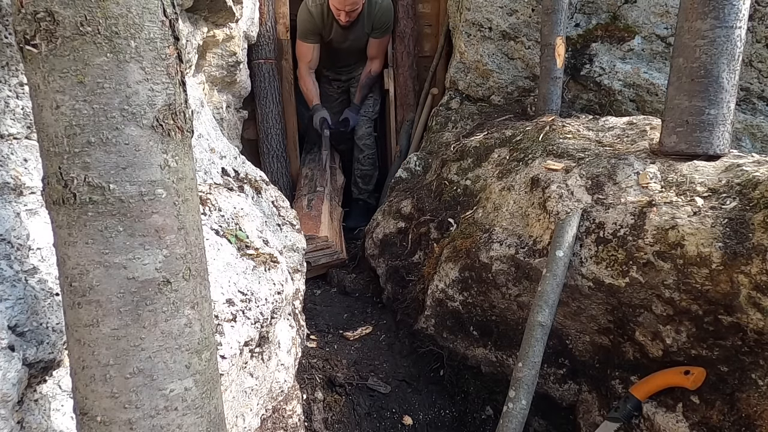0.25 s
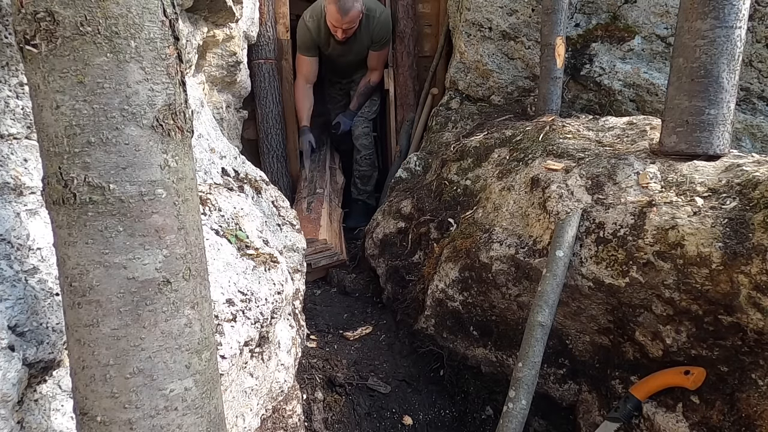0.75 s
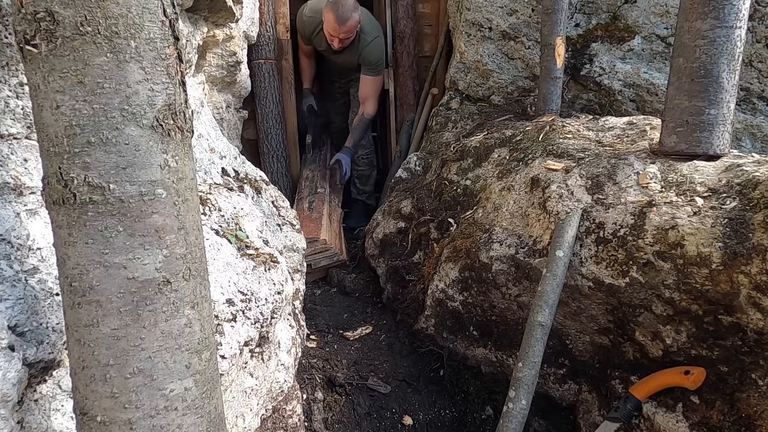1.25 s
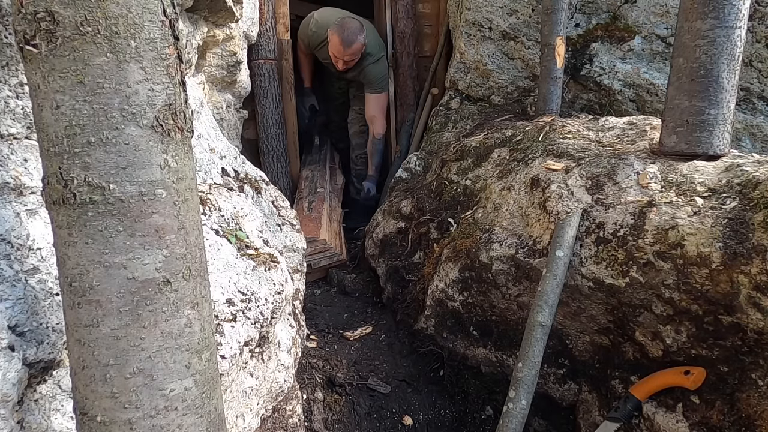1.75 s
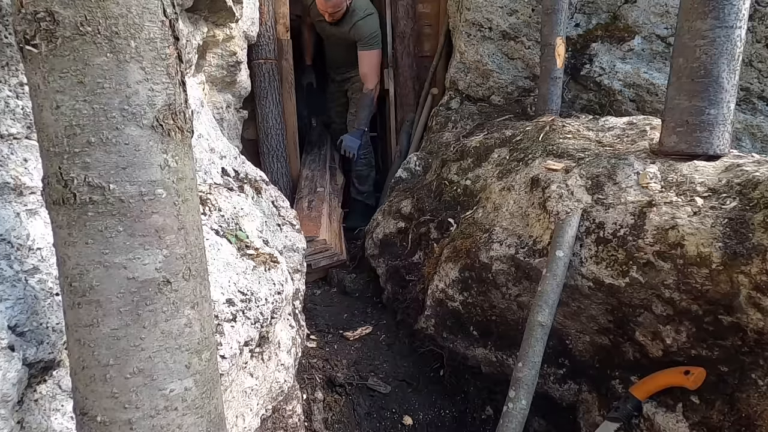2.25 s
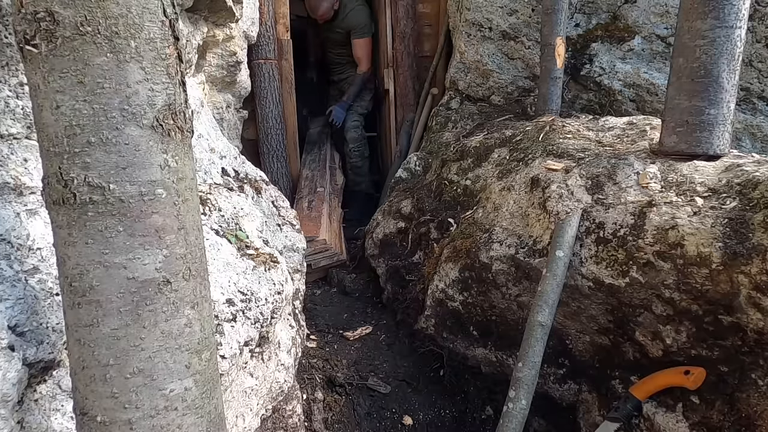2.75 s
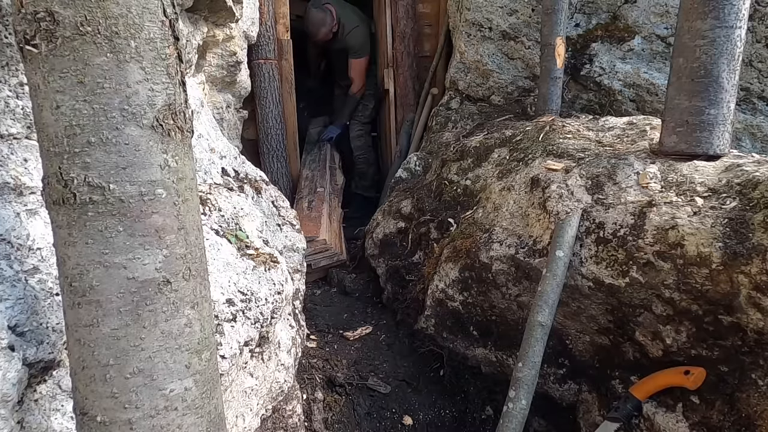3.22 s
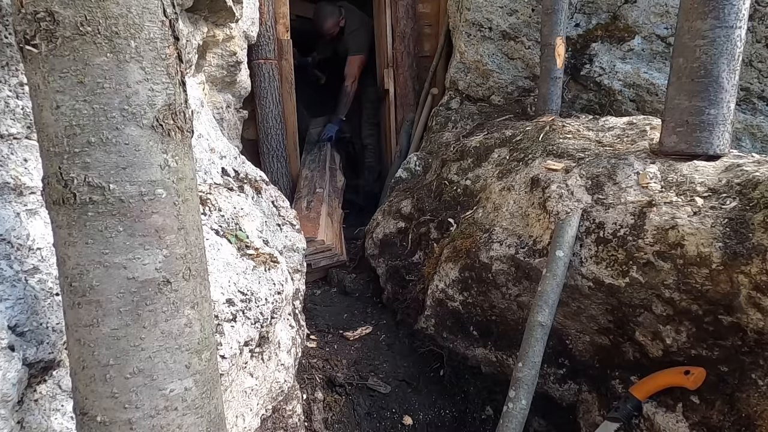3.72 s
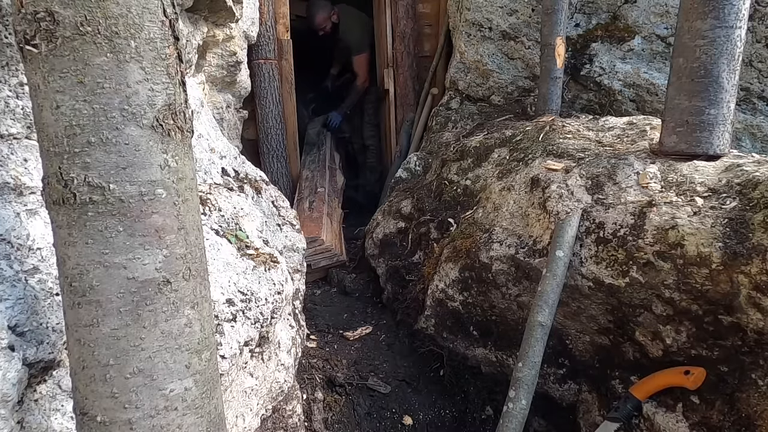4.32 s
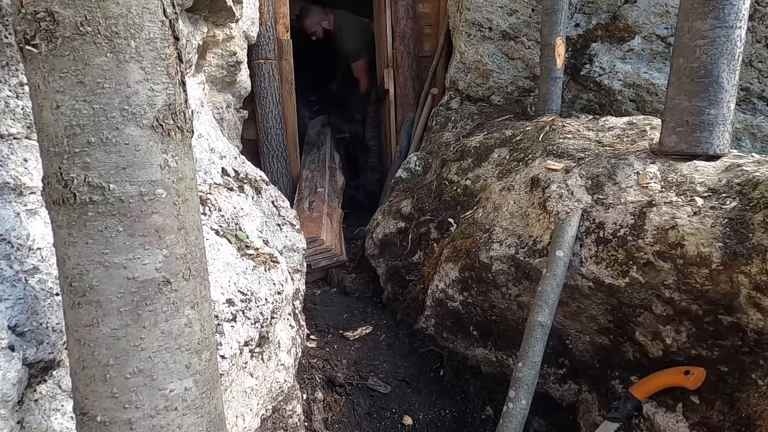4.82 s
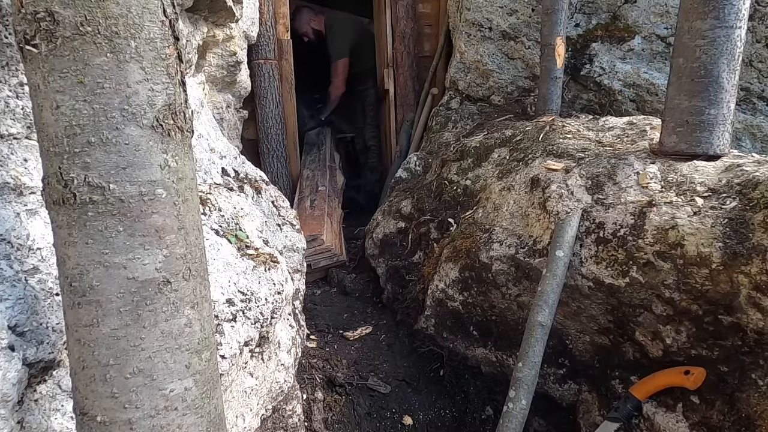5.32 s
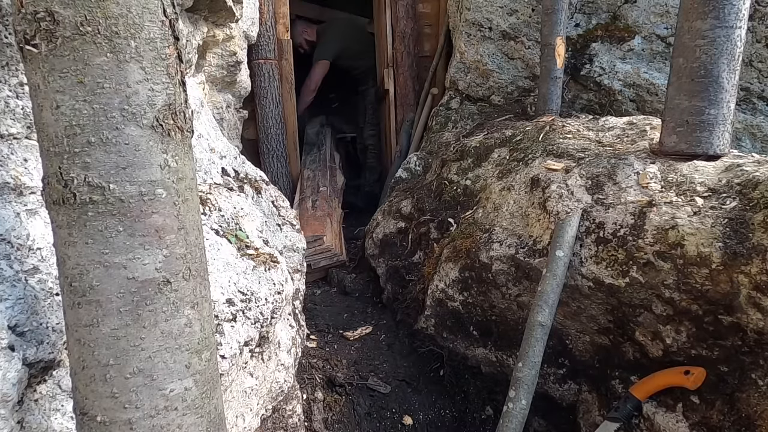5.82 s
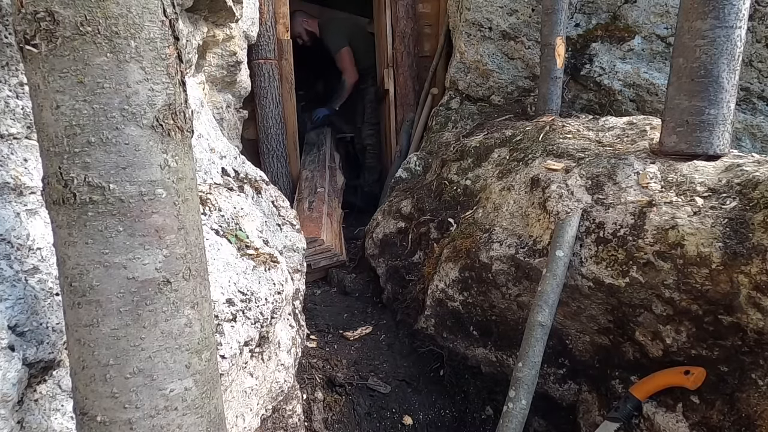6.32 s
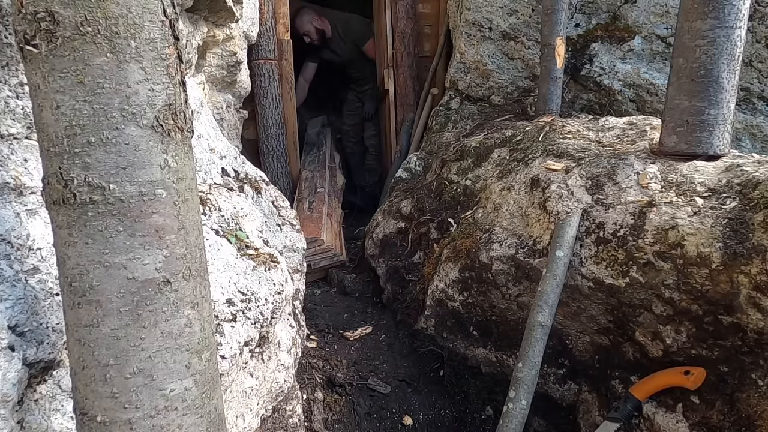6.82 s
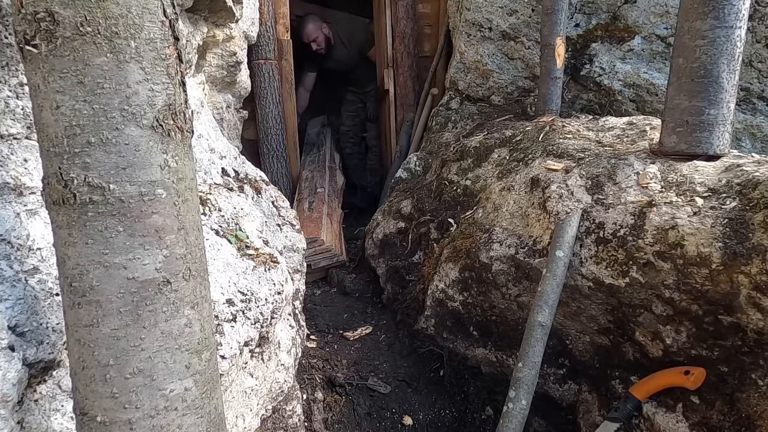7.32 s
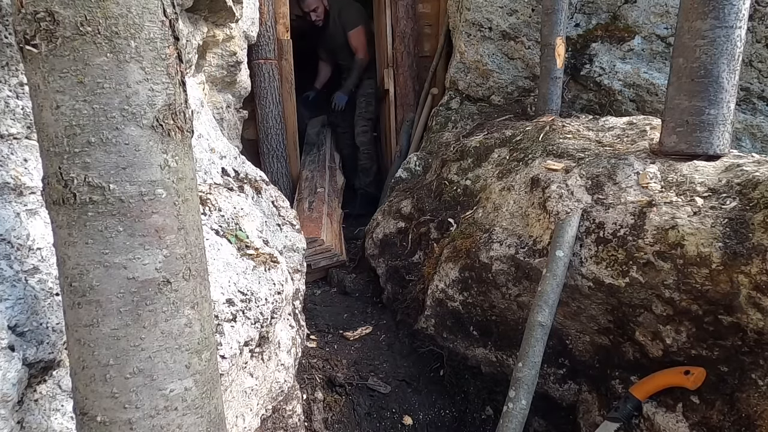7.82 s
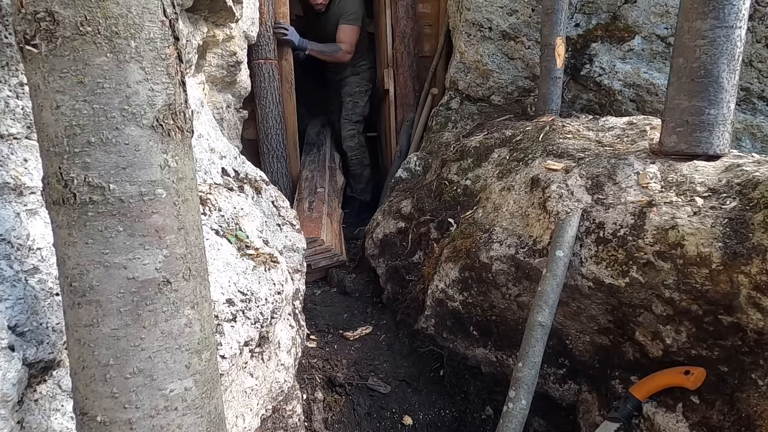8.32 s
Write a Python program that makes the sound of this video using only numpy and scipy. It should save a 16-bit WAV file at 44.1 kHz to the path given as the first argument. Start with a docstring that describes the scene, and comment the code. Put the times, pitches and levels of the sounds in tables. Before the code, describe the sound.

Heavy wooden boards knock and clatter onto a stack in a rocky cleft, with sleeve rustle, faint birdsong and soft forest murmur.

```python
"""Boards stacked between rocks

Flat wooden boards are lifted, slid and dropped onto a stack in a narrow cleft between rocks.
Random clicks ring the wood's tones, and banded noise makes the cracks, the rustle of sleeves and bark,
and the forest murmur. Birds sing some way off in bent, near-sine notes; feedback delays echo
the wood and the birds off the rock."""
import sys
import numpy as np
from scipy import signal
from scipy.fft import rfft, irfft, next_fast_len
from scipy.io import wavfile

SR = 44100
rng = np.random.default_rng(int(sys.argv[2]) if len(sys.argv) > 2 else 0)


def file_out(sig):
    """Save sig as 16-bit WAV at sys.argv[1]."""
    # one column per channel
    cols = np.atleast_2d(sig).T
    # limit, then scale
    lim = np.clip(cols, -1, 1)
    pcm = np.round(lim * 32767).astype(np.int16)
    wavfile.write(sys.argv[1], SR, pcm)


N = 377055   # length in samples

# Forest air. Each row: time in seconds, low murmur in dB, leaf hiss in dB.
AIR_LEVELS = [(0, -48, -45), (.63, -50, -48), (.75, -55.5, -55), (2.0, -54, -48), (2.6, -50.5, -49.5),
              (3.46, -45.5, -47), (3.6, -55.5, -50), (4.6, -53, -51.5), (4.9, -51.5, -48.5),
              (7.2, -49, -44.5), (8.55, -45, -51)]
# Tone colour of the air. Each row: frequency in Hz, strength in dB per Hz.
AIR_SPECTRUM = [(20, 2.5), (60, 4.5), (110, -5), (180, 6.5), (440, -5.5), (800, -10.5), (1200, -2),
                (2000, -11.5), (3300, -21), (7000, -24.5), (11000, -50), (15500, -45)]
# How alike left and right are in noisy sounds. Each row: frequency in Hz, likeness from 0 to 1.
LIKENESS = [(60, 0.48), (180, 0.21), (550, 1), (1650, 0.34), (4970, 0.53), (15000, 0.11)]
# Left-right balance of noisy sounds. Each row: frequency in Hz, left minus right in dB.
SIDE_BALANCE = [(4000, 1), (8000, -3), (13000, -5)]
# Strokes of handling. Each row: start in seconds, length in seconds, wood sliding on wood in dB,
# sleeve and bark rustle in dB.
HANDLING = [(0.0, 0.5, -83, -51.5), (0.339, 0.13, -53.5, -51), (1.013, 0.068, -28.5, -44),
            (1.183, 0.14, -72, -53), (1.584, 0.27, -47, -43.5), (1.857, 0.28, -47, -44.5),
            (2.105, 0.57, -49.5, -59), (2.279, 0.19, -48.5, -44.5), (2.604, 0.23, -53, -51.5),
            (2.818, 0.067, -49, -41.5), (2.947, 0.12, -68, -44.5), (3.744, 0.23, -49.5, -52.5),
            (4.651, 0.078, -50, -52.5), (4.772, 0.27, -43, -53.5), (5.325, 0.3, -44.5, -48),
            (5.906, 0.13, -39.5, -39), (6.083, 0.72, -47.5, -54.5), (6.433, 0.24, -57.5, -55.5),
            (7.498, 0.22, -71, -74), (8.163, 0.48, -54.5, -65), (8.437, 0.022, -75, -40)]
# Tone colour of the rustle. Each row: frequency in Hz, strength in dB per Hz.
RUSTLE_SPECTRUM = [(1500, -0.5), (2500, -7), (4000, -9.5), (7000, -14), (10000, -26), (13000, -35),
                   (15500, -50.5)]
# Tones of the boards and the stack under them. Each row: frequency in Hz, relative level in dB.
WOOD_MODES = [(64, -4.5), (88, -6.5), (130, -3.5), (158, 1), (200, 0.5), (242, 0), (320, 1.5), (368, -1.5),
              (450, -13), (535, -7.5), (695, -9), (795, -9), (920, -7.5), (1014, -6), (1105, -1.5),
              (1262, -7.5), (1390, -5), (1522, -3.5), (1834, -8), (2030, -6), (2230, -11), (2620, -14.5),
              (3075, -19)]
# Contacts. Each row: time in seconds, relative level in dB, added low body in dB, treble crack in dB,
# pitch of the spot in Hz, clatter length setting in seconds.
KNOCKS = [(0.963, -5.5, -1, -19.5, 1160, 0.052), (1.079, -36.5, -5.5, 3, 1190, 0.083),
          (1.239, -51, -3, -9, 2040, 0.03), (1.296, -51, -27, 3, 1577, 0.047),
          (1.636, -47.5, 1, -3, 1540, 0.053), (1.666, -42, -15, 8, 1500, 0.075),
          (1.719, -30.5, -12.5, 14, 1290, 0.066), (1.745, -43, -43, 3, 1160, 0.13),
          (1.91, -46, -40, -24, 1220, 0.15), (1.936, -29.5, -57, 12.5, 1980, 0.085),
          (1.975, -45.5, -51, -4, 1300, 0.3), (2.015, -35.5, -44, 12, 1160, 0.04),
          (2.312, -35, -42, -1, 1500, 0.058), (2.378, -40, -34, 21, 1420, 0.097),
          (2.782, -51.5, 15.5, -31.5, 1220, 0.041), (2.976, -40, 10, -48, 530, 0.025),
          (2.993, -35.5, 0, -53, 1270, 0.073), (3.28, -44.5, -6, -6, 1630, 0.04),
          (3.651, -6.5, -2.5, -36.5, 1255, 0.088), (4.167, -10.5, -4.5, -22.5, 1154, 0.074),
          (4.197, -17, -6.5, -29.5, 698, 0.086), (4.68, -46.5, -20, -20, 1130, 0.067),
          (4.711, -52.5, 4.5, -2, 1110, 0.04), (4.857, -49, -21.5, -7.5, 1400, .04),
          (4.899, -46.5, -19, 9, 1100, 0.043), (4.931, -45, -20, 9, 1100, 0.018),
          (5.698, -56, 7, -18.5, 200, 0.077), (5.874, -47, -37, -1, 1130, 0.16),
          (5.904, -43, -38, -21.5, 1110, 0.078), (6.004, -32, -15.5, -18, 1220, 0.045),
          (6.082, -41.5, -20, -13, 1200, 0.13), (6.443, -38.5, -8, -25, 1100, 0.069),
          (6.515, -38, -34.5, -46, 1145, 0.038), (7.361, -27.5, -3, -64, 770, 0.042),
          (7.389, -20.5, 1, -56, 583, 0.079), (7.403, -16.5, -9, -37, 870, 0.058),
          (7.529, -42, 5, 1, 1990, 0.033), (7.55, -32.5, -1.5, -31, 633, 0.12),
          (7.618, -49.5, 4, -10, 530, 0.16), (7.728, -40, -7, -24, 535, 0.075),
          (8.179, -59, 18.5, -25, 520, 0.082)]
# A board's weight lands and shakes the stack's lowest tones. Each row: time in seconds,
# relative level in dB, clatter length setting in seconds.
THUDS = [(0.964, -6.5, 0.05), (1.079, -32, 0.074), (1.718, -32.5, 0.052), (2.782, -28, 0.034),
         (2.994, -21, 0.12), (3.653, -15.5, 0.1), (4.168, -11, 0.088), (7.39, -3, 0.046),
         (7.558, -9, 0.036), (7.618, -21.5, 0.094)]
# Whistles of farther birds. Each row: start in seconds, length in seconds, start pitch in Hz,
# middle pitch in Hz, end pitch in Hz, relative level in dB.
WHISTLES = [(.035, 0.067, 2520, 2520, 2530, -63), (0.109, 0.18, 1960, 2117, 2160, -56.5),
            (0.345, 0.1, 2480, 2800, 3950, -62), (1.098, 0.25, 2346, 2175, 1810, -54.5),
            (1.26, 0.15, 4430, 4363, 4280, -66), (2.497, 0.14, 2700, 3120, 3570, -75.5),
            (4.395, 0.273, 2950, 2910, 2870, -75.5), (3.942, 0.28, 4650, 4760, 4660, -71.5),
            (4.84, 0.13, 2006, 2127, 2190, -56.5), (5.112, 0.13, 1960, 1804, 1850, -59.5),
            (5.289, 0.088, 2365, 2257, 2260, -53), (5.733, 0.051, 3360, 3244, 3150, -59),
            (5.814, 0.19, 3240, 4000, 4150, -64), (6.012, 0.049, 4140, 4060, 3600, -58),
            (7.475, 0.062, 6600, 5800, 3550, -59.5), (6.195, 0.023, 4300, 4940, 5200, -60),
            (6.524, 0.09, 5260, 4800, 6170, -64), (6.854, 0.065, 4630, 4490, 4630, -67),
            (6.928, 0.064, 5060, 5070, 5930, -69), (6.97, 0.094, 2370, 2364, 2410, -64),
            (7.229, 0.033, 5100, 4450, 3640, -62), (7.954, 0.021, 3100, 3910, 3960, -60),
            (8.0, 0.115, 2430, 2590, 2580, -68), (8.342, 0.033, 5430, 4590, 3960, -60.5)]
# A small warbler's falling note. Each row: seconds from its start, pitch in Hz, relative level in dB.
WARBLER_NOTE = [(0, 7100, -14), (.01, 5500, -9), (.02, 4300, -4), (.036, 4030, 0), (.065, 3950, -1),
                (.082, 3600, -6), (.102, 3050, -15)]
# Its song. Each row: start in seconds, pitch factor, relative level in dB.
WARBLER_SONG = [(5.249, 0.99, -57), (5.616, 1.01, -52.5), (6.351, 1.01, -58.5), (6.725, 1, -59),
                (7.095, 1.19, -56.5), (7.832, 0.93, -58.5), (8.213, 1.16, -57.5)]
# Tone colour of the cracks. Each row: frequency in Hz, strength in dB per Hz.
CRACK_SPECTRUM = [(300, -15.5), (600, -0.5), (1300, -2), (2500, -6.5), (4000, -15.5), (6500, -22),
                  (10000, -31), (15000, -59.5)]
# Something hard and thin knocks the stack. Each row: time in seconds, relative level in dB,
# clatter length setting in seconds.
CLINKS = [(7.301, -38, 0.12), (7.54, -41, 0.087), (7.612, -48.5, 0.049)]
# What the hard thing rings with. Each row: frequency in Hz, relative level in dB.
HARD_MODES = [(1100, 11), (3100, 3.5), (4900, -3.5), (7400, -10)]

DIP_TIMES_S, DIP_DB, DIP_WIDTH_S = [.655, 3.487], -12, .015   # the air's level dips briefly
STRIKE_DB, STRIKE_S = 4, 0.019   # the first blow stands above the clatter and dies fast
SETTLE, CHATTER_DB = 1.188, 3   # over 1: the clatter holds before it falls away; its unevenness
TICKS_PER_S, TICK_DB = 90, -4   # small catches while wood slides
TREBLE_QUICKER = 0.11   # the crack's treble dies sooner
CHORUS_DB = -73   # far birds, before each note's own cuts
HARD_T60_S = 0.0066   # time to ring down by 60 dB
CLEFT_T60_S, ROCK_CUT_HZ, CLEFT_DB = 0.17, 8700, -17   # echo decay before wall losses, dulling, level
TOP_CUT_HZ = 15800


def from_db(db):
    """Turns decibels into a plain factor."""
    return np.exp(np.asarray(db) * (np.log(10) / 20))


def rms_one(x):
    """Scales a signal to an average strength (rms) of 1."""
    return x / np.sqrt(np.mean(x ** 2) + 1e-20)


def in_time(rows):
    """Draws straight lines between timed rows, one curve per column."""
    s, *columns = np.transpose(rows)
    return [np.interp(np.arange(N) / SR, s, column) for column in columns]


def at_hz(points, hz):
    """Reads a table at any frequency, along a logarithmic pitch scale."""
    table_hz, values = np.transpose(points)
    return np.interp(np.log(hz), np.log(table_hz), values)


def drift(rate_hz):
    """Slow chance: noise through a double one-pole low-pass, rms 1."""
    r = np.exp(-80 * np.pi * rate_hz / SR)   # one step is 40 samples
    noise = rng.standard_normal(N // 40 + 2002)
    slow = signal.lfilter([1], [1, -2 * r, r * r], noise)[2000:]
    return np.interp(np.arange(N) / 40, np.arange(len(slow)), rms_one(slow))


def grit(per_s, spread_db):
    """Random clicks of uneven size and sign, rms 1."""
    sizes = from_db(spread_db * np.minimum(rng.exponential(1, N), 4))
    signs = rng.choice([-1, 1], N)
    return rms_one(sizes * signs * (rng.random(N) < per_s / SR))


def ring(force, hz, t60):
    """A resonance: a unit click sets a sine ringing from height 1, falling 60 dB in t60 seconds."""
    r, w = from_db(-60 / (t60 * SR)), 2 * np.pi * hz / SR
    return signal.lfilter([0, np.sin(w)], [1, -2 * r * np.cos(w), r * r], force + 1e-18)


def coloured(spectrum, grain, strength, patchy_db):
    """Splits (mid, side) grain into half-octave bands with own strength, flicker and likeness."""
    out, lowest, highest = 0, spectrum[0][0], spectrum[-1][0]
    edges = lowest * 2 ** np.arange(0, np.log2(highest / lowest) + .3, .5)
    edges = np.minimum(edges, .45 * SR)
    for k, (low, high) in enumerate(zip(edges, edges[1:])):
        hz = np.sqrt(low * high)
        band = signal.butter(2, [low, high], "band", fs=SR, output="sos")
        # every other band plays the grain backwards, so neighbours are unrelated
        mid, side = signal.sosfilt(band, grain[:, ::(-1) ** k] * strength(hz))
        alike = np.clip(at_hz(LIKENESS, hz), 0, 1)
        gain = from_db(at_hz(spectrum, hz) + patchy_db * drift(6))
        balance = from_db(at_hz(SIDE_BALANCE, hz) * np.array([[.5], [-.5]]))
        stereo = np.sqrt(1 + alike) * mid + np.sqrt(1 - alike) * side * [[1], [-1]]
        out = out + gain * balance * stereo
    return out


def clatter(rows, levels_db, quicker, rise_s):
    """Force of all contacts: each builds up and dies away as the board settles."""
    # worked out once per 8 samples
    force, t = np.zeros(N // 8 + SR // 20 + 1), np.arange(SR // 20) * 8 / SR
    for (s, *_, t60), db in zip(rows, levels_db):
        at = round((s - .001) * SR / 8)
        settling = from_db(db - 60 * (quicker * t / max(t60, .005)) ** SETTLE)
        strike = from_db(db + STRIKE_DB - 60 * t / STRIKE_S)
        force[at:at + len(t)] += (settling + strike) * (1 - np.exp(-t / rise_s)) ** 2
    return np.repeat(force, 8)[:N]


def add_note(out, at_s, hz, db):
    """Lays one near-sine note of given pitch and level curves into out."""
    at = round(at_s * SR)
    out[at:at + len(hz)] += from_db(db) * np.sin(2 * np.pi * np.cumsum(hz) / SR)


def forest_air():
    """Murmur below 500 Hz and leaf hiss above: patchy noise that swells, with two short dips."""
    t = np.arange(N) / SR
    dip_db = sum(DIP_DB * np.exp(-((t - s) / DIP_WIDTH_S) ** 2) for s in DIP_TIMES_S)
    murmur, hiss = from_db(np.array(in_time(AIR_LEVELS)) + dip_db)
    white = rng.standard_normal((2, N))
    return coloured(AIR_SPECTRUM, white, lambda hz: murmur if hz < 500 else hiss, 1.6)


def handling_strokes():
    """Each stroke swells and trails off unevenly; returns the strength of sliding and of rustle."""
    out = np.zeros((2, N + SR))
    for s, length, *db in HANDLING:
        u, at = np.linspace(0, 1, round(length * SR)), round(s * SR)
        out[:, at:at + len(u)] += np.outer(from_db(db), np.sin(np.pi * u ** 0.55))
    r = np.exp(-1 / (0.023 * SR))   # the settling bark lingers; sliding is smoothed alike
    return signal.lfilter([1 - r], [1, -r], out[:, :N]) * from_db(2.5 * drift(27.0))


def sleeve_and_bark_rustle(brush):
    """Many tiny uneven clicks of fibres, coloured and swelling with each stroke."""
    fibres = np.array([grit(14000, 3.7), grit(11800, 1.3)])
    return coloured(RUSTLE_SPECTRUM, fibres, lambda hz: brush, 1.5)


def boards(slide):
    """Contacts and sliding both ring the wood; each contact finds each tone with another strength."""
    out, grains = np.zeros(N), [grit(2500, 1.2), grit(2300, 3.6), grit(2500, 5.0)]
    chatter = from_db(CHATTER_DB * drift(70))
    knocks, thuds = np.array(KNOCKS), np.array(THUDS)
    luck_db = rng.normal(0, 3.5, (len(knocks), len(WOOD_MODES)))
    # each catch dies away within milliseconds
    caught = signal.lfilter([1], [1, -np.exp(-1 / (0.0049 * SR))], np.abs(grit(TICKS_PER_S, 2.5)))
    slide = slide * (1 + from_db(TICK_DB) * rms_one(caught))
    for k, (hz, db) in enumerate(WOOD_MODES):
        low = np.interp(np.log(hz), np.log([350, 500]), [1, 0])
        # tones near the spot's own pitch are favoured
        favoured_db = 13 * np.exp(-(np.log2(hz / knocks[:, 4]) / 0.21) ** 2)
        rows = knocks
        levels_db = knocks[:, 1] + low * knocks[:, 2] + favoured_db + luck_db[:, k]
        if hz < 100:
            rows = thuds
            levels_db = thuds[:, 1] + .5 * luck_db[:len(thuds), k]
        # the heavy stack answers later and rocks longer than the struck board
        blows = clatter(rows, levels_db - 32.5, .75 - 0.36 * low, 0.0011 + 0.0042 * low)
        force = blows * chatter + slide * from_db(-36 - 14.2 * (hz < 900))
        t60 = min(0.032 + 0.17 * (100 / hz) ** 1.6, .26)   # low tones ring longest
        out += from_db(db) * ring(force * grains[k % 3], hz, t60)
    # wood on wood is a blunt contact
    return signal.sosfilt(signal.butter(2, 4500, fs=SR, output="sos"), out)


def birds():
    """A warbler repeats its falling note; others whistle short bent tones."""
    out = np.zeros(N)
    waver = 1 + 0.005 * drift(60)   # distance and leaves blur the pitch
    for start, length, *bend_hz, level_db in WHISTLES:
        u = np.linspace(0, 1, round(length * SR))
        swell_db = 5 * np.log10(np.sin(np.pi * u) + 0.00075)
        pitch_hz = np.polyval(np.polyfit([0, .5, 1], bend_hz, 2), u)   # a smooth curve through three
        add_note(out, start, pitch_hz * waver[:len(u)], level_db + swell_db)
    s, hz, db = np.transpose(WARBLER_NOTE)
    t = np.arange(round(s[-1] * SR)) / SR
    for start, factor, level_db in WARBLER_SONG:
        # the notes start alike and end nearly alike; the middle differs in pitch
        lift = 1 + (factor - 1) * np.interp(t, [0, .02, .07, .1], [0, 1, 1, .2])
        add_note(out, start, lift * np.interp(t, s, hz), level_db + np.interp(t, s, db))
    return out * from_db(2.5 * drift(40))


def far_chorus(count):
    """Faint, nearly level notes from deep in the wood, at random moments and pitches."""
    out = np.zeros(N + SR)
    for when, pitch, length, bend, soft in rng.random((count, 5)):
        u = np.linspace(0, 1, round((.05 + .2 * length) * SR))
        hz = 2750 * 2 ** (.75 * pitch) * (1 + .08 * (bend - .5) * u)
        swell_db = 10 * np.log10(np.sin(np.pi * u) + 1e-3)
        add_note(out, when * N / SR, hz, CHORUS_DB - 8 * soft - 6 * pitch + swell_db)
    return out[:N] * from_db(4.0 * drift(60))


def cracks():
    """The broad splintery noise of each contact; hard edges are brighter, light touches thinner."""
    rows, grain = np.array(KNOCKS), np.array([grit(4000, 4.5), grit(4000, 4.5)])

    def strength(hz):
        """Force of the contacts in one band, with fresh luck for each contact."""
        edge = np.clip(np.log2(hz / 1500) * 0.23, 0, 1.8)   # 0 in the lows, growing with treble
        luck_db = rng.normal(0, 2.5, len(rows))
        body_db = .5 * (hz < 900) * rows[:, 2]
        levels_db = rows[:, 1] + edge * (rows[:, 3] + 10) - 3 + body_db + luck_db
        return clatter(rows, levels_db, 0.39 + TREBLE_QUICKER * edge, 0.002)

    return coloured(CRACK_SPECTRUM, grain, strength, 0)


def clinks():
    """Each hard knock chatters into a few broad, high resonances."""
    rows = np.array(CLINKS)
    force = clatter(rows, rows[:, 1] - 20, 0.75, 0.0017)
    return sum(from_db(db) * ring(force * grit(3000, 3.2), hz, HARD_T60_S) for hz, db in HARD_MODES)


def cleft(x):
    """Five feedback delays a side between close rock faces, duller on every round."""
    size = next_fast_len(N + SR // 2)
    angle = -2j * np.pi * np.arange(size // 2 + 1) / size
    turn = np.exp(angle)   # a delay of one sample, seen at each frequency
    dull = np.exp(-2 * np.pi * ROCK_CUT_HZ / SR)
    wall = (1 - dull) / (1 - dull * turn)
    answer = np.zeros((2, len(turn)), complex)
    lags = (rng.uniform(.005, .03, size=10) * SR).astype(int)
    for k, lag in enumerate(lags):
        loop = from_db(-60 * lag / SR / CLEFT_T60_S) * wall * np.exp(angle * lag)
        answer[k % 2] += loop / (1 - loop) * (-1) ** (k // 2)
    # low echoes escape through the open top
    thin = (1 - turn) / (1 - np.exp(-2 * np.pi * 500 / SR) * turn)
    return irfft(rfft(x, size) * answer * thin, size)[:, :N]


def scene():
    """Wood near the microphone, birds beyond, all in the cleft and the forest air."""
    air = forest_air()
    slide, brush = handling_strokes()
    rustle = sleeve_and_bark_rustle(brush)
    wood = boards(slide) + clinks()
    song = birds() + far_chorus(count=14)
    near = wood * from_db([[.25], [-.25]]) + cracks()
    echo = from_db(CLEFT_DB) * cleft(near.mean(axis=0) + 4.3 * song)
    return near + echo + song * from_db([[-3.1], [-1.2]]) + rustle + air


def record(dry):
    """The microphone drops the deepest bass, peaks are rounded, the top is cut."""
    dry = np.array([np.r_[0, dry[0, :-1]], dry[1]])   # the left port lies a little farther: one sample
    dry = signal.sosfilt(signal.butter(4, 46, "high", fs=SR, output="sos"), dry)
    rounded = np.tanh(dry)
    return signal.sosfilt(signal.cheby2(12, 70, TOP_CUT_HZ, fs=SR, output="sos"), rounded)


dry = scene()
out = record(dry)
file_out(out)
```